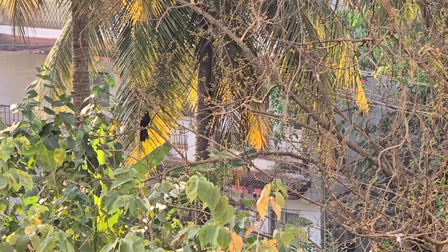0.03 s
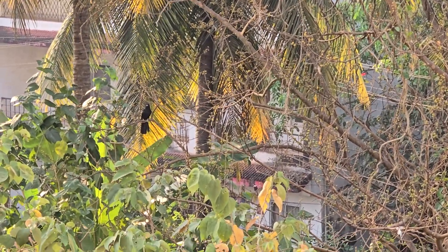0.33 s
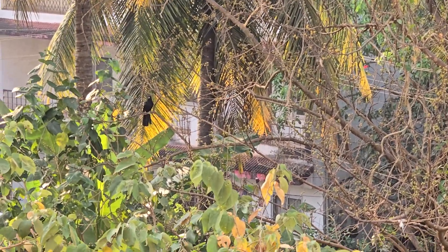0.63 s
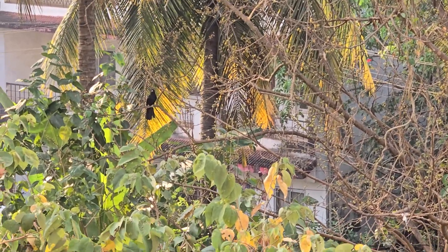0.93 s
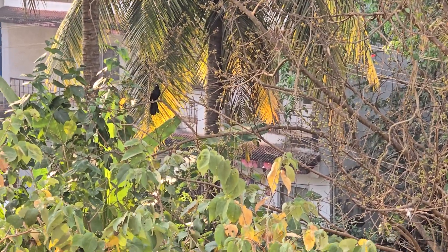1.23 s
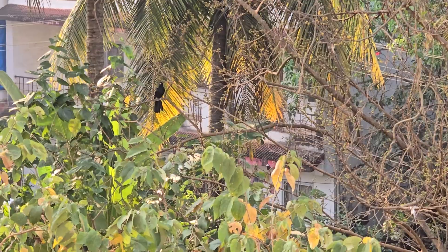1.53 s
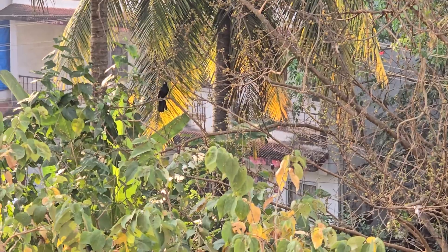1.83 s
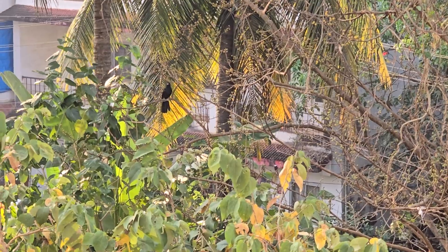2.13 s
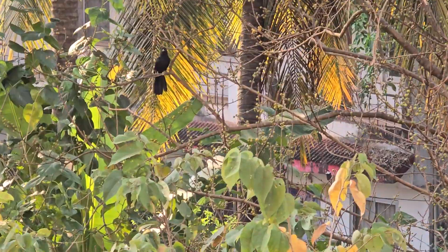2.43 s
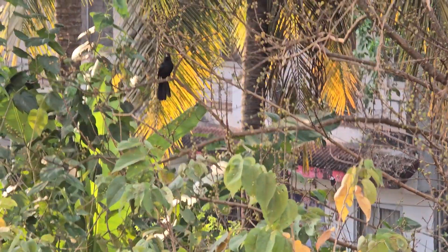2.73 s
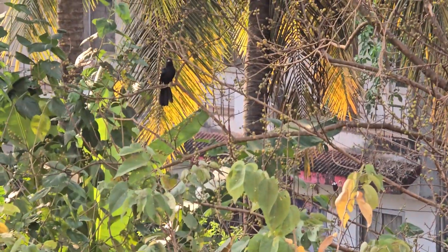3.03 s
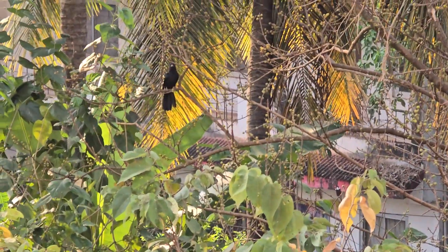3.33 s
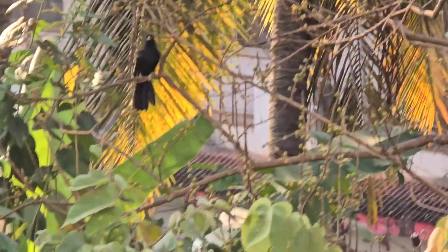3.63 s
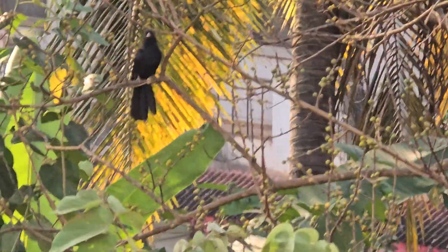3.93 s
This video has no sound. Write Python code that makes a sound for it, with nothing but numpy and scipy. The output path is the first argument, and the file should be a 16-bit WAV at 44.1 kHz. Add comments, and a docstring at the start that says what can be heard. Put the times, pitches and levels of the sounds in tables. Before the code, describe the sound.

A low rumble and soft hiss run through a garden on a hand-held camera. Small birds whistle faintly far off and a distant crow caws twice. Halfway through, fingers begin to tap and bump the casing as the hiss grows.

```python
"""A leafy garden is heard through a hand-held camera: hiss and traffic hum at the open right microphone,
the rumble of the hand at the muffled left one. Small birds whistle far off from the start, and the grip
begins to thump. A distant crow caws twice in rasping pulses, while faint traffic tones come and go.
From two seconds on, fingers tap and scuff the casing, and the hiss grows as the camera zooms in."""
import sys
import numpy as np
from scipy import signal
from scipy.fft import rfft, irfft, next_fast_len
from scipy.io import wavfile
from scipy.ndimage import uniform_filter1d, map_coordinates

SR = 44100
rng = np.random.default_rng(int(sys.argv[2]) if len(sys.argv) > 2 else 0)


def transcribe(u):
    """Save the signal u as a 16-bit wav file named by the first command-line argument.

    u: samples, shape (n,) or (channels, n), limited to [-1, 1]; the rate is SR.
    q: integer samples, one column per channel.
    """
    v = np.clip(np.atleast_2d(u).T, -1, 1)
    q = np.round(v * 32767).astype(np.int16)
    wavfile.write(sys.argv[1], SR, q)


N = 176400

# Spectra of the background noises (frequency [Hz], relative density [dB])
HISS_SPECTRUM = [(300, -29.5), (480, -8), (610, 6), (720, 5), (900, -5.5), (1080, -3), (1200, 0.5),
                 (1630, 1), (1780, -1.5), (2700, -4), (3100, -3.5), (3800, -0.5), (4700, 1), (5550, 3.5),
                 (5900, -7), (6500, -18.5), (7000, -37.5), (7600, -59)]
HUM_SPECTRUM = [(20, -24), (35, -30.5), (60, -0.5), (100, -15.5), (180, -3.5), (245, -5.5), (300, -10),
                (420, -16), (600, -52.5), (1500, -64.5)]
FIZZ_SPECTRUM = [(8000, -45.5), (9500, -26.5), (10800, -15.5), (11800, 0), (12600, -9.5), (13400, -10.5),
                 (14000, -18), (14800, -18.5), (15700, -22.5)]
RUMBLE_SPECTRUM = [(10, -58), (22, -8.5), (35, 2.5), (52, 1), (70, -5.5), (100, -12.5), (160, -13.5),
                   (220, -21.5), (300, -33.5), (500, -43.5), (900, -87)]
MUFFLED_SPECTRUM = [(200, 5), (380, 6), (470, 1.5), (520, 6), (570, -5), (700, 2), (900, -2.5), (1250, 0.5),
                    (1600, -13), (2600, -15), (3300, -12.5), (4800, -20), (8000, -42.5), (15000, -39)]
# Envelopes of the background noises (time [s], level [dB])
HISS_ENVELOPE = [(0, -48), (1, -45.5), (1.9, -44), (2.4, -44.5), (2.8, -42), (3.3, -40), (3.6, -39.5),
                 (4, -40)]
HUM_ENVELOPE = [(0, -50.5), (2, -48.5), (3, -45.5), (4, -40)]
FIZZ_ENVELOPE = [(0, -70.5), (1.5, -70), (2.2, -64.5), (3.3, -60.5), (4, -61)]
RUMBLE_ENVELOPE = [(0, -23.5), (1.2, -26), (1.7, -24), (2.02, -25), (2.22, -21), (2.25, -44), (2.30, -29),
                   (2.34, -25), (2.7, -23), (3.1, -25), (3.5, -20.5), (3.85, -22), (4, -8.5)]
# Bird notes (time [s], duration [s], time to the turn [s], start pitch [Hz], turning pitch [Hz],
# end pitch [Hz], relative level [dB], roughness [0-1])
BIRD_NOTES = [ (0.036, 0.09, 0.035, 3316, 3345, 3360, -42.5, 0),
              (0.186, 0.057, 0.026, 3150, 3000, 3350, -45, 1),
              (0.384, 0.06, 0.049, 3950, 3930, 3690, -41.5, 0.17),
              (0.455, 0.1, 0.02, 3220, 3170, 2600, -53.5, .45),
              (.515, 0.065, 0.025, 3850, 3900, 3730, -52, .45),
              (0.708, 0.055, 0.04, 2380, 2720, 2800, -50, 0.4),
              (0.758, 0.075, 0.055, 3370, 3290, 3080, -47.5, 0.35),
              (.835, .03, 0.017, 3950, 3550, 3680, -42.5, 0.54),
              (1.035, 0.019, 0.0089, 3440, 3670, 3650, -44, .2),
              (1.066, 0.055, 0.05, 3087, 3280, 3290, -45, 0),
              (1.125, 0.12, 0.05, 3280, 3300, 3520, -53, 0.1),
              (1.148, 0.12, 0.046, 5210, 5330, 5360, -47.5, 0.2),
              (1.239, 0.1, 0.026, 3720, 3740, 3600, -43.5, 0.12),
              (1.3, 0.02, 0.003, 6350, 6280, 6030, -49, 0), (1.354, .028, .015, 4870, 4900, 4850, -45, 0.1),
              (1.382, .026, .014, 4850, 3950, 3850, -43, .4),
              (1.412, 0.036, 0.014, 3380, 3260, 3100, -44.5, 0),
              (1.48, .06, .012, 4830, 4760, 4400, -50.5, .3),
              (1.509, 0.11, 0.023, 3700, 3756, 3560, -48, .2),
              (1.843, 0.05, .025, 3004, 3670, 3670, -53, 0.5),
              (1.848, 0.048, 0.006, 6880, 6800, 6050, -52, 0.1),
              (1.98, 0.079, .025, 5600, 5620, 5170, -49, 0.25),
              (2.372, 0.06, 0.03, 3150, 2850, 3180, -43, 1),
              (2.572, .03, 0.014, 3910, 3948, 3890, -43.5, 0.08),
              (2.622, 0.038, 0.025, 3940, 3990, 3900, -39, 0),
              (2.68, 0.13, 0.044, 3960, 3960, 3950, -50, 0.12),
              (2.908, 0.05, 0.03, 2700, 2930, 3180, -46.5, 0.3),
              (2.965, 0.04, 0.02, 3280, 3360, 3340, -43.5, 0.05),
              (3.012, 0.045, 0.02, 3850, 3930, 3980, -39.5, 0.2),
              (3.237, 0.07, 0.06, 2960, 3220, 3230, -43, 0.15),
              (3.411, .105, 0.019, 3680, 3860, 3584, -38, 0.05),
              (3.525, 0.069, 0.029, 3630, 4540, 3200, -37, 0.32),
              (3.585, .028, .014, 3200, 3060, 3060, -41.5, 0),
              (3.698, 0.17, .037, 3740, 3927, 3570, -40, 0.12),
              (3.848, 0.048, 0.029, 5450, 5360, 5220, -46.5, 0.16),
              (3.906, .06, 0.016, 4700, 4770, 3000, -42.5, .35)]
# Flexing of the camera body (time [s], level [dB], frequency [Hz], duration [s])
GRIP_THUMPS = [(0.28, -15.5, 41, 0.043), (0.692, -11, 43.2, 0.025), (1.293, -11.5, 39.4, 0.041),
               (1.939, -18, 38.5, 0.089), (2.341, -13, 52, 0.02), (2.672, -12.5, 35, 0.044),
               (2.75, -12.5, 55, 0.045), (2.798, -5, 46.7, 0.041), (2.928, -7, 48, 0.04),
               (3.36, -11, 41, 0.059), (3.451, -3.5, 44, 0.06), (3.516, -3.5, 63, .036),
               (3.667, -11, 32.3, 0.055), (3.747, -10, 58.5, 0.029), (3.93, -5.5, 36.3, 0.044)]
# Thin far calls (time [s], duration [s], centre [Hz], width [Hz], relative level [dB])
THIN_CALLS = [(0.6, 0.13, 5360, 600, -54), (1.016, 0.049, 790, 60, -46), (1.577, 0.14, 6070, 440, -50)]
# Crow caws (time [s], duration [s], relative level [dB])
CROW_CAWS = [(0.641, 0.17, -44), (1.114, 0.2, -45.5)]
# Resonance of the crow's throat (frequency [Hz], relative gain [dB])
CROW_THROAT = [(600, -48), (1000, 1), (1400, 10.5), (1950, 6.5), (2200, -4), (4000, -47.5)]
# Traffic tones (time [s], duration [s], centre [Hz], width [Hz], left level [dB], right level [dB])
TRAFFIC_TONES = [(0.684, 0.89, 527.4, 7.4, -57, -72.5), (2.01, 0.31, 238, 29, -75, -49),
                 (2.363, 0.41, 526, 12, -54, -71), (2.8, 1.2, 1615, 24, -81.5, -54.5),
                 (3.046, 0.4, 819, 7, -78, -53), (3.3, 0.97, 1464, 12, -82.5, -55.5)]
# Ticks and scuffs (time [s], centre [Hz], width [Hz], T60 [s], left level [dB], right level [dB])
CASING_TICKS = [(2.005, 3500, 900, 0.018, -52, -62), (2.142, 800, 450, 0.078, -34, -49),
                (2.147, 2800, 1100, .05, -52, -60), (2.246, 4630, 1000, 0.24, -51, -62),
                (2.2588, 4500, 700, 0.0073, -23, -36), (2.2585, 1500, 1200, 0.0089, -32.5, -49),
                (2.474, 5500, 400, 0.021, -71, -35.5), (2.473, 12600, 1517, 0.21, -78, -45.5),
                (2.8, 650, 200, .07, -45, -71), (3.514, 5500, 1220, 0.083, -60, -59)]
# Finger taps (time [s], level [dB], contact frequency [Hz])
FINGER_TAPS = [(2.006, -27, 515), (2.01, -25, 374), (2.148, -29, 520), (2.152, -29.5, 700),
               (2.156, -20.5, 320), (2.695, -30.5, 230), (2.748, -19.5, 162), (2.807, -15, 123),
               (3.336, -28, 520), (3.5161, -3, 195), (3.5241, -14.5, 129), (3.608, -24, 258)]
# Modes of the camera body (frequency [Hz], relative level [dB], T60 [s])
BODY_MODES = [(70.5, -12, 0.032), (232, -9.5, 0.013), (457, -7, 0.031), (950, -7, 0.067)]

BIRD_LEFT_DB = -32  # attenuation at the muffled microphone


def amp(db):
    """Amplitude ratio: a factor of ten for every 20 dB."""
    return 10 ** (np.asarray(db) / 20)


def stereo(left_db, right_db):
    """Level difference between the microphones, as a column of two gains."""
    return amp([[left_db], [right_db]])


def unit(x):
    """Normalisation to rms 1."""
    return x / np.sqrt(np.mean(x ** 2) + 1e-20)


def clock():
    """Uniform sampling: the time of each sample in seconds."""
    return np.arange(N) / SR


def wobble(rate):
    """Random modulation: a spline through `rate` Gaussian knots a second."""
    return map_coordinates(rng.standard_normal(int(N * rate / SR) + 4), [clock() * rate])


def filtered(x, response):
    """Linear filtering: the spectrum is multiplied by a frequency response."""
    size = next_fast_len(N + SR // 2)
    return irfft(rfft(x, size) * response(np.fft.rfftfreq(size, 1 / SR)), size)[..., :N]


def coloured(x, spectrum):
    """Spectral shaping, interpolated in log frequency, at rms 1."""
    knots_hz, db = np.transpose(spectrum)
    return unit(filtered(x, lambda hz: amp(np.interp(np.log(hz + 1), np.log(knots_hz), db))))


def band(centre_hz, width_hz):
    """Band-pass noise with a Gaussian response whose standard deviation is the width."""
    noise = rng.standard_normal(N)
    return unit(filtered(noise, lambda hz: np.exp(-.5 * ((hz - centre_hz) / width_hz) ** 2)))


def rush(spectrum, patchy_db):
    """Fluctuating noise: its gain varies in random patches of time and frequency."""
    cells = signal.stft(rng.standard_normal(N), nperseg=512)[2]
    patches = uniform_filter1d(rng.standard_normal(cells.shape), size=3, axis=0)
    patches = unit(uniform_filter1d(patches, size=14, axis=1))
    noise = signal.istft(cells * amp(patchy_db * patches), nperseg=512)[1][:N]
    return coloured(noise, spectrum)


def level(envelope):
    """Amplitude envelope, interpolated in decibels."""
    return amp(np.interp(clock(), *np.transpose(envelope)))


def gate(start, length, attack, release):
    """Time window with linear ramps centred on its two ends, all in seconds."""
    t = clock() - start
    return np.clip(t / attack + .5, 0, 1) * np.clip((length - t) / release + .5, 0, 1)


def garden(x, wall_db=-13.5, tail_db=-8, t60_s=0.95):
    """Reverberation: six walls reflect distinct echoes, and leaves scatter a decaying tail."""
    t = np.arange(SR) / SR
    tail = rng.standard_normal(SR) * amp(-60 * t / t60_s) * (1 - np.exp(-t / 0.023))
    delays_s = np.geomspace(.008, .11, 6) * rng.uniform(.85, 1.15, size=6)
    walls = np.bincount((delays_s * SR).astype(int), minlength=SR)
    reflections = amp(wall_db) * walls + amp(tail_db) * tail / np.linalg.norm(tail)
    return x + signal.fftconvolve(x, reflections)[:N]


def background():
    """Broadband noise: airborne sound on the right; hand rumble and muffled air on the left."""
    hiss = level(HISS_ENVELOPE) * rush(HISS_SPECTRUM, patchy_db=3)
    hum = level(HUM_ENVELOPE) * rush(HUM_SPECTRUM, patchy_db=4.5)
    fizz = level(FIZZ_ENVELOPE) * rush(FIZZ_SPECTRUM, patchy_db=2.5)
    lumps = amp(2 * wobble(20))
    rumble = level(RUMBLE_ENVELOPE) * lumps * rush(RUMBLE_SPECTRUM, patchy_db=0.5)
    muffled_air = amp(-54) * rush(MUFFLED_SPECTRUM, patchy_db=3)
    return np.array([rumble + muffled_air, hiss + hum + fizz])


def bird_whistles():
    """Frequency modulation: each tone glides to a turning pitch and away; rough ones warble fast."""
    t, notes = clock(), np.zeros(N)
    waver = 1 + .002 * wobble(160)
    warble = 0.0497 * wobble(450)
    flutter = amp(3 * wobble(60))
    for start, length, turn, start_hz, turn_hz, end_hz, db, roughness in BIRD_NOTES:
        into = np.sin(np.pi / 2 * np.clip((t - start) / turn, 0, 1))
        away = np.sin(np.pi / 2 * np.clip((t - start - turn) / max(length - turn, 1e-3), 0, 1)) ** 2
        hz = start_hz + (turn_hz - start_hz) * into + (end_hz - turn_hz) * away
        phase = 2 * np.pi * np.cumsum(hz * (waver + roughness * warble)) / SR
        notes += amp(db) * gate(start, length, attack=0.0092, release=0.011) * np.sin(phase)
    return stereo(BIRD_LEFT_DB, 0) * amp(-1.5) * garden(np.sqrt(2) * notes * flutter)


def grip_thumps():
    """Structure-borne sound: the grip flexes the body in low tones under half-sine windows."""
    thumps = np.zeros(N)
    for start, db, hz, length in GRIP_THUMPS:
        t = np.clip(clock() - start, 0, length)
        thumps += amp(db) * np.sin(np.pi * t / length) * np.sin(2 * np.pi * hz * t)
    return stereo(0, -40) * thumps


def thin_calls():
    """Band-limited bursts: far calls, each blurred to a band of noise and smeared by echoes."""
    calls = sum(amp(db) * band(hz, width) * gate(start, length, attack=0.048, release=0.045)
                for start, length, hz, width, db in THIN_CALLS)
    return stereo(BIRD_LEFT_DB, 0) * garden(calls)


def crow(pitch_hz=186, rasp=.7):
    """Source and filter: jittering pulses and rasping noise excite the throat's resonance."""
    cycles = np.cumsum(pitch_hz * (1 + 0.045 * wobble(70))) / SR
    pulses = unit(np.diff(np.floor(cycles), prepend=0))
    voice = coloured((1 - rasp) * pulses + rasp * rng.standard_normal(N), CROW_THROAT)
    envelope = sum(amp(db) * gate(start + 0.012, length - .02, attack=0.083, release=0.31)
                   for start, length, db in CROW_CAWS)
    return stereo(-20, 0) * garden(voice * envelope)


def traffic_drones():
    """Narrow-band noise: close frequencies beat, so the tones of far traffic waver."""
    return sum(stereo(left, right) * band(hz, width) * gate(start, length, attack=0.19, release=0.25)
               for start, length, hz, width, left, right in TRAFFIC_TONES)


def casing_ticks(attack_s=0.00033):
    """Damped transients: each click or scuff is a band of noise that decays exponentially."""
    ticks = np.zeros((2, N))
    for start, hz, width, t60, left, right in CASING_TICKS:
        t = np.maximum(clock() - start, 0)
        envelope = (1 - np.exp(-(t / attack_s) ** 2)) * amp(-60 * t / t60)
        ticks += stereo(left, right) * band(hz, width) * envelope
    return ticks


def finger_taps():
    """Modal excitation: a push and pull rings the body; soft contact weakens the higher modes."""
    taps = np.zeros(N)
    for start, db, contact_hz in FINGER_TAPS:
        phase = 2 * np.pi * contact_hz * (clock() - start)
        push_pull = -phase * np.exp((1 - phase ** 2) / 2)
        t = np.maximum(clock() - start, 0)
        ring = sum(amp(mode_db - 60 * t / t60) * np.sin(2 * np.pi * hz * t)
                   for hz, mode_db, t60 in BODY_MODES)
        soft_ring = filtered(ring, lambda hz: np.exp(-(hz / (2 * contact_hz)) ** 2))
        taps += amp(db) * (push_pull - soft_ring)
    return stereo(0, -44.5) * taps


def scene():
    """Superposition: the sources add at each microphone."""
    return (background() + bird_whistles() + grip_thumps() + thin_calls() + crow()
            + traffic_drones() + casing_ticks() + finger_taps())


def record(dry):
    """Band limiting: the camera passes nothing above its cutoff."""
    cutoff_hz = 15750
    return filtered(dry, lambda hz: hz < cutoff_hz)


dry = scene()
out = record(dry)
transcribe(out)
```